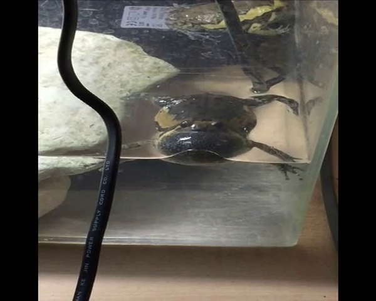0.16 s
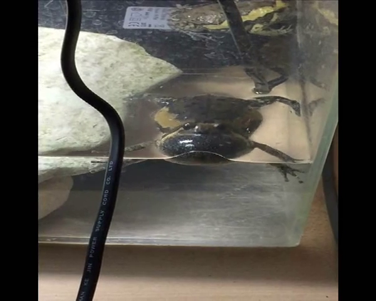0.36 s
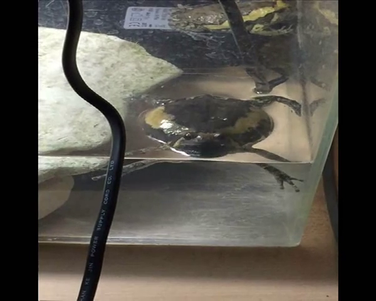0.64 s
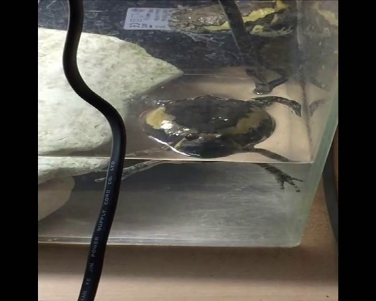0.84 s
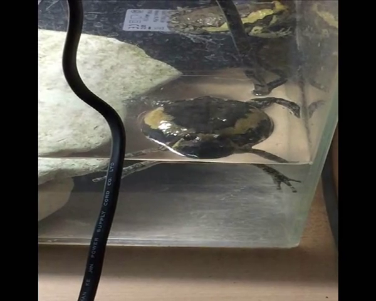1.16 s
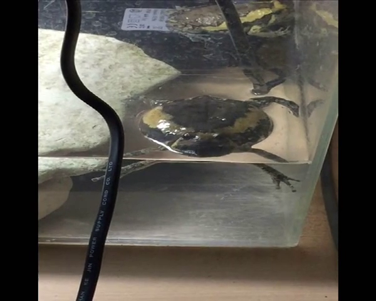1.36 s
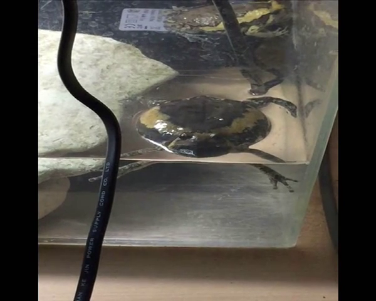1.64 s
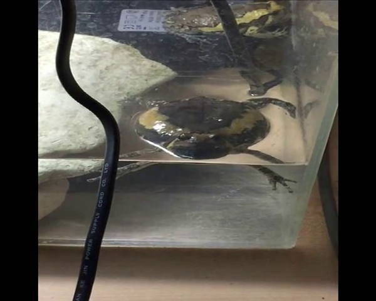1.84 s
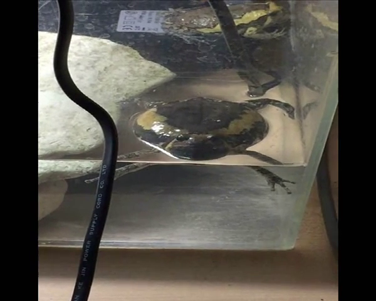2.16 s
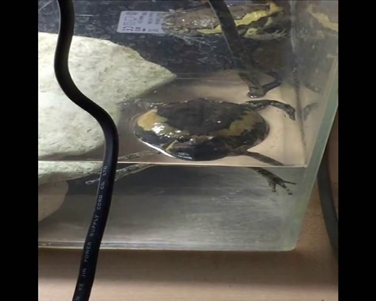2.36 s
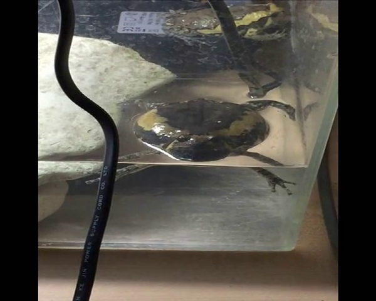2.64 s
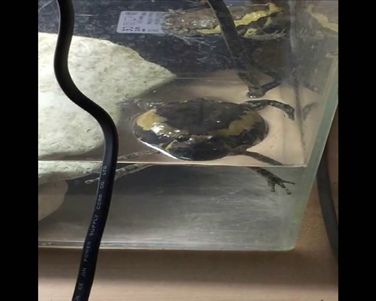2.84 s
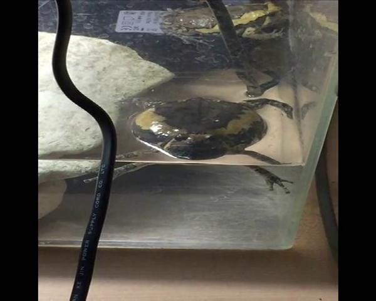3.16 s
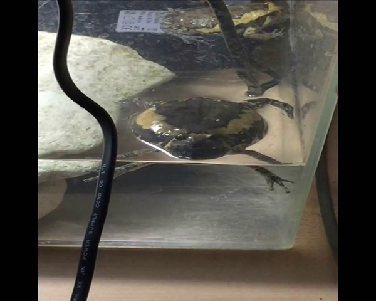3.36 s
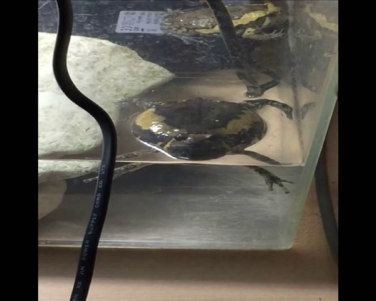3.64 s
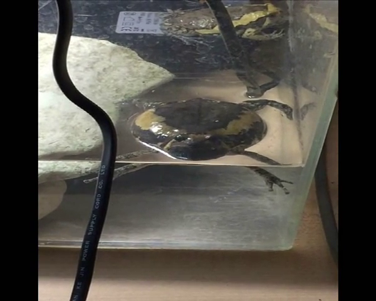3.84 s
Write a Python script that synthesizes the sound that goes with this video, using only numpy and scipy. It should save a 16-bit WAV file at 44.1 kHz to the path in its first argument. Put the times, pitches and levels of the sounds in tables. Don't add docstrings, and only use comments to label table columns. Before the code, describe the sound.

A frog in a glass tank, close to the microphone, ends a rough rasp and locks into one loud, low, buzzing bellow, swelling around 0.25 s and breaking off near 0.55 s. A short hollow ring and a barely audible croak and gulp follow by 0.8 s. Faint high cricket chirps come in small groups until 3.9 s over quiet hiss, hum and rumble; a very soft far thud falls at 2.7 s.

```python
import sys
import numpy as np
from scipy import signal
from scipy.fft import rfft, irfft
from scipy.io import wavfile

SR = 44100
rng = np.random.default_rng(int(sys.argv[2]) if len(sys.argv) > 2 else 0)


def store_pcm(level_fs):
    pcm = np.round(np.clip(level_fs, -1, 1) * 32767).astype(np.int16)
    wavfile.write(sys.argv[1], SR, np.atleast_2d(pcm).T)


def decibels_to_gain(level_db):
    exponent = np.asarray(level_db, float) / 20
    return 10 ** exponent


N = 176400
T = np.arange(N) / SR


def rms_one(x):
    return x / np.sqrt(np.mean(x ** 2) + 1e-20)


def drift(rate_hz, count=1):
    r = np.exp(-2 * np.pi * rate_hz / SR)
    white = rng.standard_normal((count, SR + 20000))
    return rms_one(signal.lfilter([1], [1, -2 * r, r * r], white)[:, 20000:])


def stretched(row):
    return np.interp(T, np.linspace(0, T[-1], SR), row)


def gate(t, start, length, rise, fall):
    return np.clip((t - start) / rise, 0, 1) * np.clip((start + length - t) / fall + 1, 0, 1)


def peak(x, hz, width_hz):
    r = np.exp(-np.pi * width_hz / SR)
    poles = [1, -2 * r * np.cos(2 * np.pi * hz / SR), r * r]
    return signal.lfilter([(1 - r * r) / 2, 0, (r * r - 1) / 2], poles, x + 1e-18)


def noise(points, patchy_db):
    hz, db = np.transpose(points)
    f = np.fft.rfftfreq(N, 1 / SR) + 1e-9
    level = decibels_to_gain(np.interp(np.log(f), np.log(hz), db))
    spectrum = rfft(rng.standard_normal(N)) * level * (f > hz[0]) * (f < hz[-1])
    out = 0
    for low in hz[0] * 2 ** np.arange(0, np.log2(hz[-1] / hz[0]), .5):
        band = irfft(spectrum * (f >= low) * (f < low * 2 ** .5), N)
        out = out + decibels_to_gain(patchy_db * stretched(drift(30)[0])) * band
    return rms_one(out)


def opening_click():
    level_db, decay_s = -38, 7e-5
    return -decibels_to_gain(level_db) * np.exp(-T / decay_s)


def rumble():
    # (frequency [Hz], level [dB per Hz])
    rumble_bands = [(22, -23), (38, -13), (50, -2), (64, -9.5), (100, -9.5), (140, -13.5), (290, -14.5),
                    (500, -22.5)]
    return decibels_to_gain(-72) * noise(rumble_bands, patchy_db=1.9)


def hiss():
    # (frequency [Hz], level [dB per Hz])
    hiss_bands = [(290, -33.5), (500, -2), (1050, -4.5), (1140, -5), (2330, -5), (15400, -14)]
    notch_hz, notch_width_hz, notch_share = 10450, 500, 0.46
    steady = noise(hiss_bands, patchy_db=-0.38)
    return decibels_to_gain(-73) * (steady - notch_share * peak(steady, notch_hz, notch_width_hz))


def hum():
    # (frequency [Hz], level [dB])
    hum_tones = [(49.3, -73.5), (80, -82.5), (100, -84), (200, -88.5), (222, -88.5), (242, -86.5),
                 (300, -85.5)]
    waver_db, slip_rad = 1.6, .6
    slow = [stretched(row) for row in drift(16, count=2 * len(hum_tones))]
    out = 0
    for k, (hz, db) in enumerate(hum_tones):
        level = decibels_to_gain(db + 1 + waver_db * slow[k])
        out = out + level * np.sin(2 * np.pi * hz * T + slip_rad * slow[-1 - k])
    return out


def rasp(rows, throat):
    lead = SR // 10
    out = np.zeros(N + SR)
    for start, length, hz, db, uneven in rows:
        luck = rng.standard_normal((40, 2))
        periods = 1 + .5 * uneven * luck[:, 0].clip(-1.5, 1.5)
        s = start + np.cumsum(periods) / hz - 1 / hz
        keep = s < start + length
        clicks = np.zeros(SR + lead)
        clicks[(s[keep] * SR + lead).astype(int)] = 1 + uneven * luck[keep, 1]
        rung = 0
        for k, (f, width, g) in enumerate(throat):
            rung = rung + decibels_to_gain(g) * (-1) ** k * peak(peak(clicks, f, width), f, 2 * width)
        out[:SR + lead] += decibels_to_gain(db) * rung / np.sqrt(np.sum(rung ** 2) / (length * SR))
    return out[lead:lead + N]


def fast_rasp():
    # (start [s], length [s], rate [Hz], level [dB], unevenness [0-1])
    fast_pulses = [
        (-0.028, 0.048, 361, -33, 0.021),
    ]
    # (frequency [Hz], width [Hz], level [dB])
    fast_throat = [(386, 50, 1)]
    return rasp(fast_pulses, fast_throat)


def onset_rasp():
    # (start [s], length [s], rate [Hz], level [dB], unevenness [0-1])
    onset_pulses = [
        (-.02, 0.06, 260, -28, 0.19),
        (.036, .029, 177.7, -25.5, .22),
        (.069, 0.018, 190.9, -32, .4),
    ]
    # (frequency [Hz], width [Hz], level [dB])
    onset_throat = [(248.8, 110, -11), (367.6, 54, 3), (516, 90, -1), (760, 57, 5.5), (878.2, 90, -1),
                    (1037, 130, -4), (1263, 130, -11), (1800, 320, -23), (2338, 150, -32.5),
                    (2670, 110, -31.5), (4000, 1800, -44)]
    return rasp(onset_pulses, onset_throat)


def wing_strokes(rows, sag_db, scrape_db):
    # (frequency [Hz], width [Hz], level [dB])
    wing = [(6300, 970, -5.5), (8700, 600, -4.5), (11300, 500, 0.5)]
    stroke_s, fall_hz, flutter_db, scrape_s = 0.017, 79.53, 3.5, .008
    t = T[:SR // 20]
    out = np.zeros(N + SR)
    for s, db, hz in rows:
        tone = np.sin(2 * np.pi * ((hz + fall_hz / 2) * t - fall_hz * t * t / stroke_s / 2))
        level = decibels_to_gain(flutter_db * drift(98)[0, :len(t)] - sag_db * t / stroke_s)
        tone = tone * level * gate(t, 0, stroke_s, .003, .003)
        grit = rng.standard_normal(len(t)) * gate(t, stroke_s - .001, scrape_s, .001, .008)
        scrape = sum(decibels_to_gain(g) * peak(grit, f, width) for f, width, g in wing)
        i = max(int((s - .002) * SR), 0)
        out[i:i + len(t)] += decibels_to_gain(db) * (tone + decibels_to_gain(scrape_db) * scrape)
    return out[:N]


def far_cricket():
    # (time [s], peak level [dB], pitch [Hz])
    far_strokes = [(0.0024, -55, 4520), (0.0459, -49.5, 4490), (0.088, -54.5, 4489), (0.1892, -54, 4340),
                   (0.6464, -63, 4460), (0.6975, -56.5, 4347), (1.0303, -68.5, 4403), (1.062, -63, 4390),
                   (1.4062, -57, 4475), (1.4638, -53.5, 4470), (1.507, -56, 4304), (1.5573, -56.5, 4290),
                   (1.6043, -60, 4420), (1.9724, -61.5, 4300), (2.0181, -56.5, 4286), (2.0705, -61, 4396),
                   (2.617, -59.5, 4315), (2.6678, -57, 4320), (3.0626, -60, 4290), (3.109, -56.5, 4304),
                   (3.1597, -56, 4340)]
    return wing_strokes(far_strokes, sag_db=5.5, scrape_db=-22.0)


def sac_levels(t):
    # (multiple of pitch [1], level [dB])
    slack = [(1, -25.5), (2, 0), (3, -8), (4, -15.5), (5, -10), (6, -7.5), (7, -18.5), (8, -12.5), (9, -29),
             (10, -33), (11, -30), (12, -36.5), (13, -38), (14, -37), (15, -48), (16, -45), (17, -45.5),
             (18, -54.5), (19, -57), (20, -65), (21, -55.5), (22, -51), (23, -49.5), (24, -57.5), (25, -49),
             (26, -65), (27, -50), (28, -46)]
    swelling = [(1, -24.5), (2, 0), (3, -11), (4, -15.5), (5, -14), (6, -14.5), (7, -14.5), (8, -13),
                (9, -32.5), (10, -35.5), (11, -39.5), (12, -40.5), (13, -37.5), (14, -39), (15, -47),
                (16, -55.5), (17, -48), (18, -56.5), (19, -55), (20, -58.5), (21, -61), (22, -48.5),
                (23, -50.5), (24, -56), (25, -49.5), (26, -45), (27, -46.5), (28, -46)]
    rounded = [(1, -30.5), (2, 1), (3, -12.5), (4, -17), (5, -22.5), (6, -14), (7, -24.5), (8, -14),
               (9, -30.5), (10, -29), (11, -35), (12, -42.5), (13, -42), (14, -35), (15, -42.5),
               (16, -54.5), (17, -49.5), (18, -50), (19, -56.5), (20, -54.5), (21, -63.5), (22, -45),
               (23, -62), (24, -56.5), (25, -51.5), (26, -46.5), (27, -56), (28, -56)]
    full = [(1, -31.5), (2, 1), (3, -11.5), (4, -16.5), (5, -16), (6, -19), (7, -27), (8, -17), (9, -39.5),
            (10, -27), (11, -31.5), (12, -44), (13, -43), (14, -36), (15, -42.5), (16, -56), (17, -50.5),
            (18, -49), (19, -57), (20, -50.5), (21, -59), (22, -48), (23, -55), (24, -51), (25, -50.5),
            (26, -41.5), (27, -49), (28, -56)]
    taut = [(1, -29), (2, 1), (3, -12), (4, -17), (5, -27), (6, -21), (7, -29), (8, -15), (9, -35),
            (10, -25.5), (11, -33), (12, -43.5), (13, -37), (14, -34.5), (15, -44), (16, -58.5),
            (17, -44.5), (18, -53), (19, -50), (20, -48), (21, -55), (22, -41.5), (23, -52.5), (24, -46.5),
            (25, -46), (26, -36.5), (27, -50), (28, -58)]
    tight = [(1, -26.5), (2, 1.5), (3, -12), (4, -17.5), (5, -21), (6, -24), (7, -34), (8, -18.5),
             (9, -50.5), (10, -22), (11, -31.5), (12, -46), (13, -44), (14, -35.5), (15, -41), (16, -56.5),
             (17, -53.5), (18, -43), (19, -47), (20, -54), (21, -61.5), (22, -36.5), (23, -58.5),
             (24, -45.5), (25, -40.5), (26, -40), (27, -56), (28, -56)]
    sac_s = (.11, .19, .26, .335, .415, .5)
    # (slack level [dB], half full level [dB], tight level [dB])
    faint = [(-50, -42, -54.5), (-49.5, -62.5, -64), (-53, -57, -66), (-55.5, -62.5, -67),
             (-49.5, -65, -70.5), (-54.5, -54, -69), (-64.5, -57, -64.5), (-61, -66, -67.5),
             (-64, -55.5, -50.5)]
    faint_s = (.12, .3, 0.41)
    strong_rows = np.array([slack, swelling, rounded, full, taut, tight])[:, :, 1].T
    faint_rows = [np.interp(sac_s, faint_s, row) for row in faint]
    return [np.interp(t, sac_s, row) for row in np.vstack([strong_rows, faint_rows])]


def bellow():
    # (time [s], pitch [Hz], level [dB])
    contour = [
        (0.056, 164.9, -25),
        (.096, 160.6, -24),
        (.144, 160.6, -21.5),
        (.24, 162.7, -19.5),
        (.3, 162.8, -19.5),
        (.36, 162.3, -22.5),
        (.478, 162.7, -26.5),
        (.528, 161.9, -29.5),
    ]
    # (multiple of pitch [1], T60 [s])
    ring_on = [(1, 0.16), (2, 0.22), (3, .16), (4, .13), (7, .1), (10, .24), (12, .1), (14, .1)]
    quick_t60_s, lock_s = 0.038, 0.0042
    air_db, air_hz, breath_db = -59.5, (11000, 14800), -33
    jitter_hz, wander_db, grain_db = .3, .7, 1.6
    spread_rad, slip_rad = .88, .35
    t = T[:SR]
    s, hz, db = np.transpose(contour)
    phase = 2 * np.pi * np.cumsum(np.interp(t, s, hz) + jitter_hz * drift(82)[0]) / SR
    levels = sac_levels(t)
    wander = drift(9, count=len(levels))
    grain = drift(60, count=len(levels))
    after = np.maximum(t - s[-1], 0)
    t60_of = {round(multiple): t60 for multiple, t60 in ring_on}
    tone, power = 0, 0
    for k, level in enumerate(levels):
        level = level + wander_db * min(k, 6) / 6 * wander[k] + grain_db * min(k / 20, 1) * grain[k]
        gain = decibels_to_gain(level)
        lock = np.clip((t - s[0]) / lock_s / (1 + k * k / 110), 0, 1)
        decay = decibels_to_gain(-60 * after / t60_of.get(k + 1, quick_t60_s))
        slip = slip_rad * min(k / 8, 1.5) * wander[-1 - k]
        tone = tone + gain * lock * decay * np.sin((k + 1) * phase - spread_rad * k * k + slip)
        power = power + gain ** 2 / 2
    tone = tone / np.sqrt(power) * (1 + decibels_to_gain(breath_db) * drift(149.3)[0])
    band = signal.butter(3, air_hz, "band", fs=SR, output="sos")
    air = rms_one(signal.sosfilt(band, rng.standard_normal(SR)))
    air = air * (1 + 0.63 * np.cos(phase))
    air = air * decibels_to_gain(air_db - 60 * after / quick_t60_s) * np.clip((t - s[0]) / .1, 0, 1)
    return np.pad((tone + air) * decibels_to_gain(np.interp(t, s, db)), (0, N - SR))


def break_rasp():
    # (start [s], length [s], rate [Hz], level [dB], unevenness [0-1])
    break_pulses = [
        (.528, .02, 170.1, -42.5, 0.22),
        (.552, 0.03, 152.3, -49.5, 0.23),
        (.588, .05, 141, -63.5, 0.23),
    ]
    # (frequency [Hz], width [Hz], level [dB])
    break_throat = [(199, 98, -3.5), (493, 83, 4.5), (750, 120, -4), (910, 130, 2), (1280, 49, -6.5),
                    (1500, 160, -9.5), (1900, 280, -24), (2300, 150, -21.5)]
    return rasp(break_pulses, break_throat)


def ring():
    # (frequency [Hz], level [dB], T60 [s])
    ring_modes = [(321, -47.5, .33), (95, -59, .15)]
    start_s, rise_s, last_s, stop_s = .612, .018, .082, .022
    t = np.maximum(T - start_s, 0)
    modes = sum(decibels_to_gain(db - 60 * t / t60) * np.sin(2 * np.pi * hz * t) for hz, db, t60 in ring_modes)
    return gate(t, 0, last_s, rise_s, stop_s) * modes


def croak():
    # (start [s], length [s], rate [Hz], level [dB], unevenness [0-1])
    croak_pulses = [
        (.721, 0.015, 172.2, -57.5, 0.29),
    ]
    # (frequency [Hz], width [Hz], level [dB])
    croak_throat = [(345, 97, 0), (744, 61, -1.5)]
    return rasp(croak_pulses, croak_throat)


def gulp():
    # (start [s], length [s], rate [Hz], level [dB], unevenness [0-1])
    gulp_pulses = [
        (.739, 0.026, 190, -62, 0.395),
        (.768, 0.0218, 154.4, -71, 0.37),
    ]
    # (frequency [Hz], width [Hz], level [dB])
    gulp_throat = [(527, 49, 0), (763, 160, -7.5), (1195, 86, 0), (1560, 120, -18)]
    return rasp(gulp_pulses, gulp_throat)


def far_thud():
    start_s, hz, level_db, t60_s, rise_s = 2.73, 61.7, -55.5, 0.26, 0.016
    t = np.maximum(T - start_s, 0)
    return decibels_to_gain(level_db - 60 * t / t60_s) * np.clip(t / rise_s, 0, 1) * np.sin(2 * np.pi * hz * t)


def near_cricket():
    # (time [s], level before the swell [dB], pitch [Hz])
    near_strokes = [
        (3.762, -75, 4344),
        (3.793, -60.5, 4310),
        (3.847, -56, 4184),
    ]
    return wing_strokes(near_strokes, sag_db=-7.0, scrape_db=4.5)


def room(x):
    t60_s, cut_hz = .17, 4500
    t = T[:SR // 2]
    tail = rng.standard_normal(len(t)) * decibels_to_gain(-60 * t / t60_s) * (t > .004)
    tail = signal.sosfilt(signal.butter(1, cut_hz, fs=SR, output="sos"), tail)
    return signal.fftconvolve(x, tail / np.sqrt(np.sum(tail ** 2)))[:N]


def scene():
    floor = opening_click() + rumble() + hiss() + hum() + far_thud()
    rasps = fast_rasp() + onset_rasp() + break_rasp() + croak() + gulp()
    frog = rasps + bellow() + ring()
    crickets = decibels_to_gain(-5.0) * (far_cricket() + near_cricket())
    wet = room(decibels_to_gain(-22) * frog + decibels_to_gain(-8.5) * crickets)
    return (frog + crickets + wet + floor)[None]


def roll_off(x):
    return signal.sosfilt(signal.butter(12, 15320, fs=SR, output="sos"), x)


def record(dry):
    mic_low_hz = 37.6
    mix = signal.sosfilt(signal.butter(2, mic_low_hz, "high", fs=SR, output="sos"), dry)
    return roll_off(mix)


dry = scene()
out = record(dry)
store_pcm(out)
```